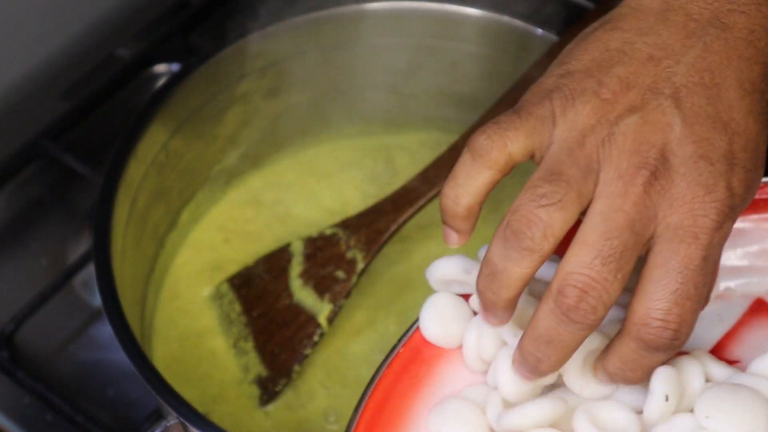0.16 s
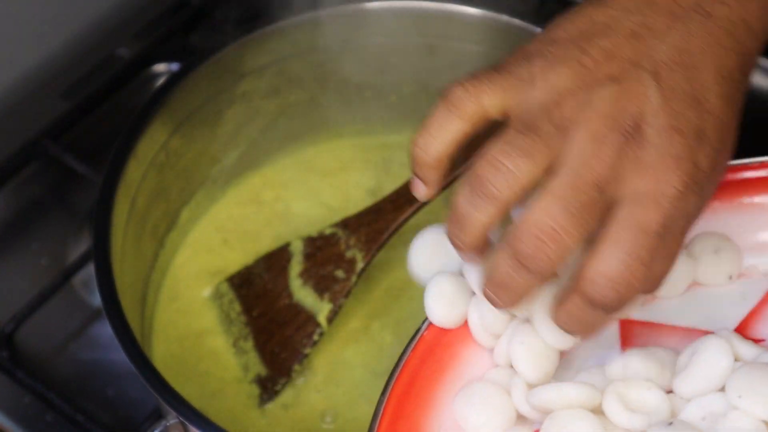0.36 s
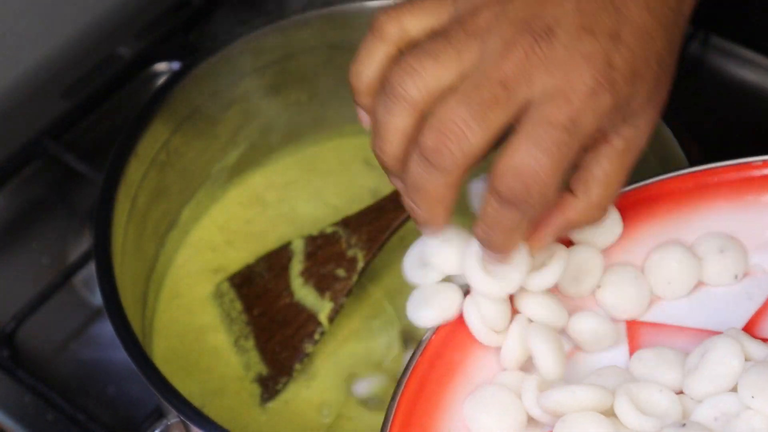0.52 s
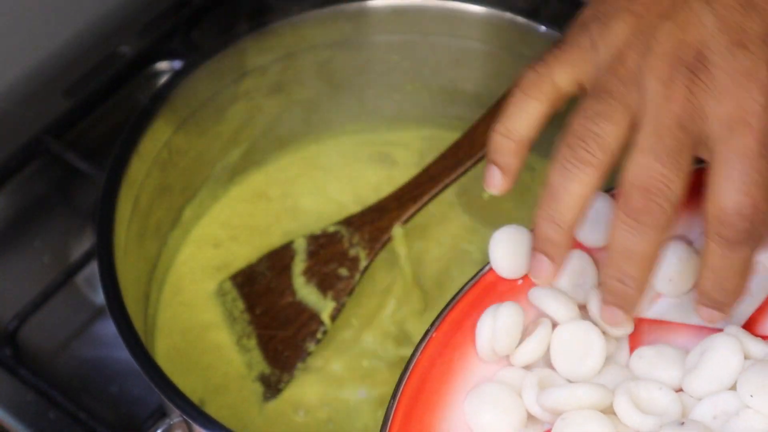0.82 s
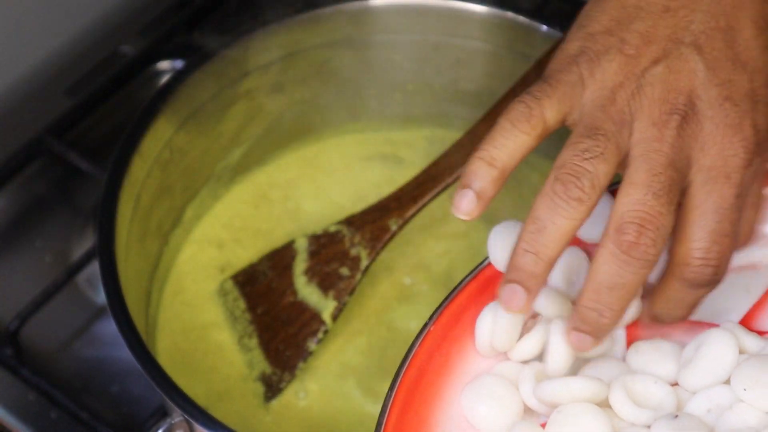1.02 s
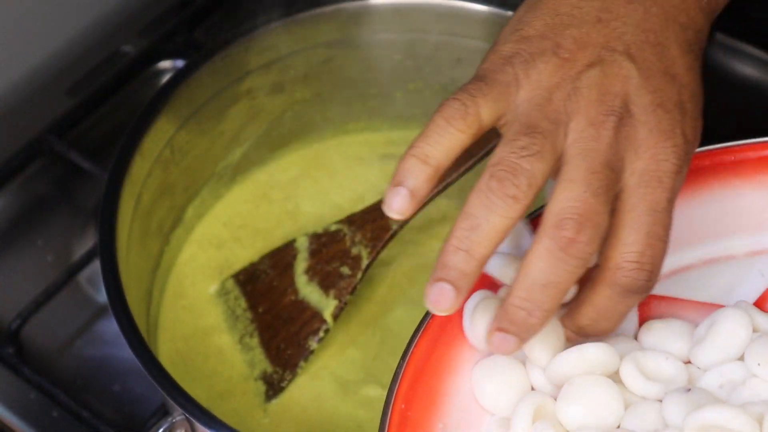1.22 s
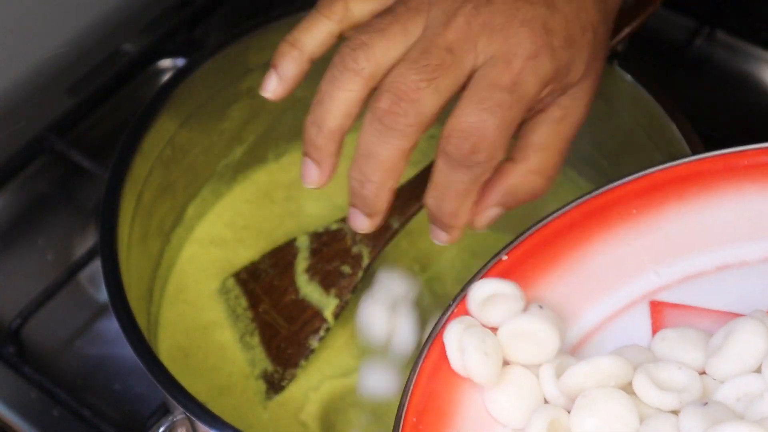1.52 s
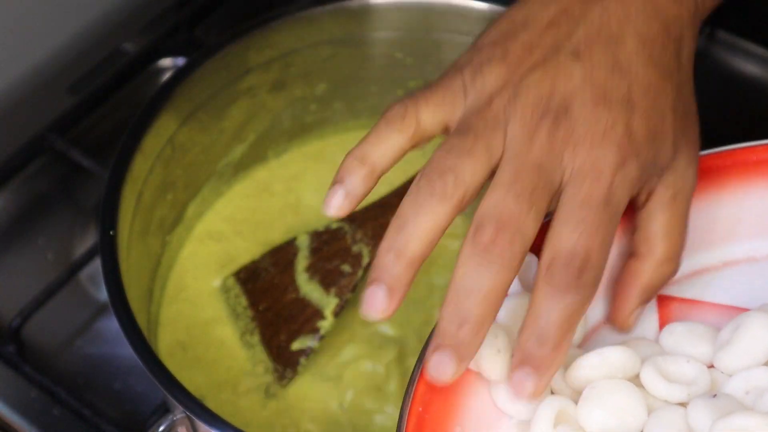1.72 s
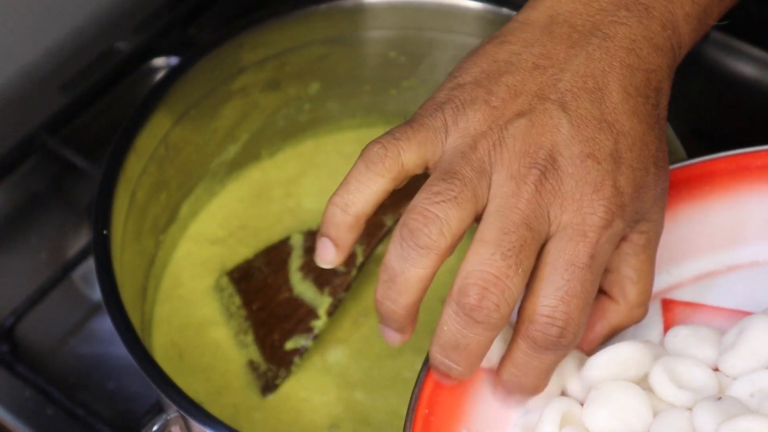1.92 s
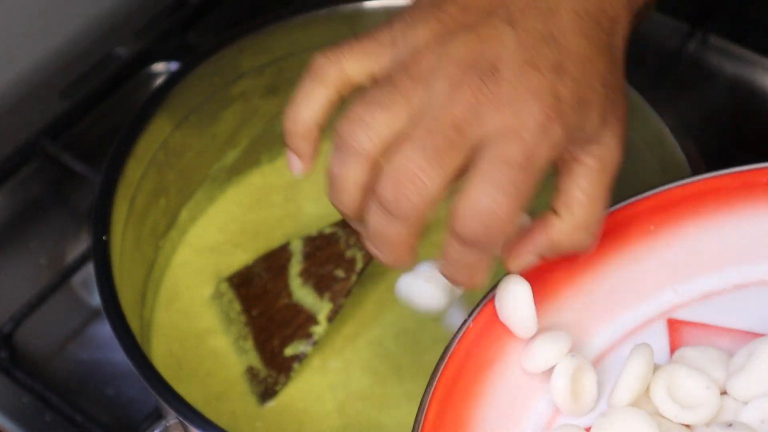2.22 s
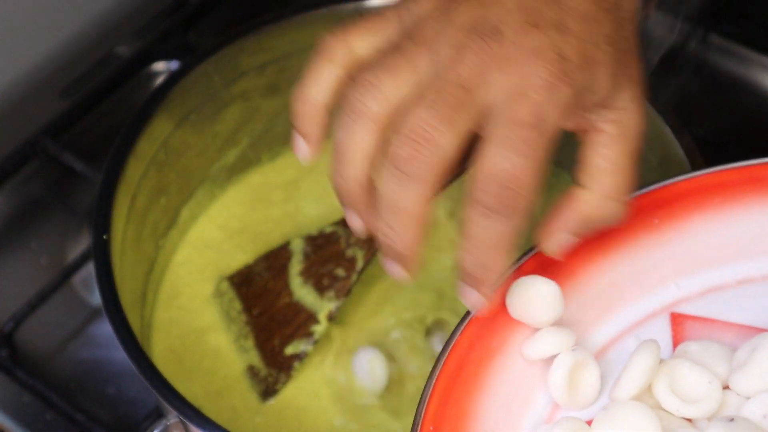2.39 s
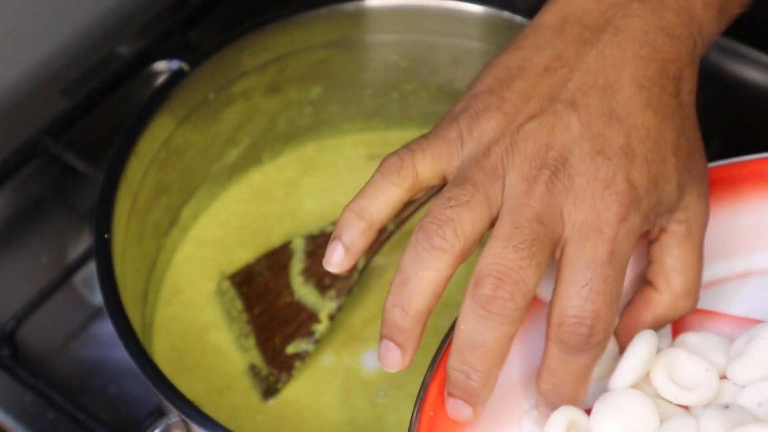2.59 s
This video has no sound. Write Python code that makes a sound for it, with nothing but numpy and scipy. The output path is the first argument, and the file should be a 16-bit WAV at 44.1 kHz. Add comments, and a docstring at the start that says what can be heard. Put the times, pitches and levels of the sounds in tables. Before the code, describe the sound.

Close, wide stereo kitchen sound: a plate bumps a pot once, then clusters of dough balls tick and plop into bubbling sauce, with faint rustling and finger scuffs between them over a steady low hum.

```python
"""Dough balls into simmering sauce

A plate knocks a pot once, as a sum of fading tones with echoes and a noisy room tail. Grainy noise makes
the dough balls rustle and fingertips scuff. Three handfuls of balls drop in: wet ticks are bursts of noise
with tiny pings, plops and bubbles are short fading tones. Underneath, shaped noise is the burner's hum and
the simmer's hiss, with murmuring bubbles. Close up in a kitchen: bass centred, treble very wide."""
import sys
import numpy as np
from scipy import signal
from scipy.fft import rfft, irfft, next_fast_len
from scipy.io import wavfile
from scipy.ndimage import map_coordinates

SR = 44100
rng = np.random.default_rng(int(sys.argv[2]) if len(sys.argv) > 2 else 0)


def pcm_store(signal):
    """Save signal as 16-bit PCM."""
    levels = np.round(np.clip(np.atleast_2d(signal), -1, 1) * 32767)
    wavfile.write(sys.argv[1], SR, levels.astype(np.int16).T)


N = 121275  # length in samples

# All the "t60" times below are how long a sound takes to fade by 60 dB.
# How wide the sound is. Each row: pitch in Hz, sides over centre in dB.
WIDTH = [(60, -39), (110, -23), (200, -9.5), (700, -7), (1290, -3), (2380, 3), (4400, 3.5), (8120, 9.5),
         (15000, 4)]
# Left-right balance of the pot. Each row: pitch in Hz, left over right in dB.
LEAN = [(950, 0), (1890, -1.5), (3770, 2), (7520, 4), (15000, -2)]
TOP_HZ = 15900  # nothing sounds above this

# Colour of the burner's hum. Each row: pitch in Hz, relative level in dB.
BURNER_COLOUR = [(12, -30), (20, -8), (74, 4), (119, -5), (152, 0), (203, -6.5), (296, -6), (371, -13.5),
                 (440, -3.5), (560, -12.5), (880, -81)]
# Loudness of the hum. Each row: time in seconds, level in dB.
BURNER_LEVEL = [(.3, -46.5), (.6, -45), (1.05, -44.5), (1.9, -46), (2.75, -45)]
# Colour of the simmer's hiss. Each row: pitch in Hz, relative level in dB.
SIMMER_COLOUR = [(210, -30), (400, -10), (540, -2.5), (841, -6), (1380, -9.5), (2690, -19.5), (2960, -16.5),
                 (6900, -19.5), (8760, -45), (9640, -28.5), (12000, -23), (14600, -42), (15800, -94)]
# Loudness of the simmer. Each row: time in seconds, level in dB.
SIMMER_LEVEL = [(0, -48.5), (.3, -48), (.6, -46.5), (1.1, -45), (1.35, -47.5), (1.8, -45), (2.3, -48),
                (2.75, -47)]
# The pot's resonances. Each row: pitch in Hz, width in Hz, relative level in dB.
POT_RESONANCES = [(524, 10, -3.5), (706, 9.2, -19), (897, 7.9, -0.5), (1309, 21, 0.5), (1437, 12, -2),
                  (1553, 4.5, 4), (2456, 13, -7.5), (2938, 30.5, -6), (5100, 14.6, -6)]
POT_DB = -54.5

# Simmer bubbles: average rate, typical level, middle pitch, spread of its natural log, fading time
BURBLE_PER_S, BURBLE_DB, BURBLE_HZ, BURBLE_SCATTER, BURBLE_T60_S = 34, -58.5, 473, 0.36, 0.019

KNOCK_S, KNOCK_DB = .1079, -12  # time and overall level of the plate's knock
KNOCK_LOW_HZ = 140  # the knock carries little bass below this
# The plate's dull body. Each row: pitch in Hz, relative level in dB, t60 in seconds.
THUD = [(300, -8, 0.046), (488, 0, 0.039), (790, 4.5, 0.014), (840, -3.5, 0.02), (1240, -14, 0.07)]
# The pot's short metallic ring. Each row: pitch in Hz, relative level in dB, t60 in seconds.
METAL = [(2200, -21, 0.026), (3540, -22.5, 0.061), (4590, -25, .05), (5360, -13.5, 0.023),
         (5700, -24.5, 0.047), (6700, -22, 0.031)]
METAL_LAG_S = .0015
# The pot's wall humming on. Each row: pitch in Hz, relative level in dB.
AFTER_RING = [(163, -25), (300, -23.5), (447, -24), (516, -19.5), (708, -20.5), (761, -26), (898, -20.5),
              (1041, -27)]
AFTER_RING_T60_S = 0.25
# Stove and walls answering the knock. Each row: delay in seconds, relative level in dB.
WALLS = [(.0053, -19), (0.0147, -21), (.0205, -24), (0.0353, -31)]
# Colour of the noisy tail of knock and plops. Each row: pitch in Hz, relative level in dB.
ROOM_COLOUR = [(80, -28), (170, -15), (280, 15.5), (500, -3), (900, 5), (1300, 3), (1900, -11), (6000, -14),
               (9000, -79)]

# Balls rustling on the plate. Each row: middle in seconds, half-length in seconds, level in dB.
RUSTLES = [(0.442, 0.047, -48), (0.622, 0.052, -44.5), (0.999, 0.071, -50.5), (1.12, 0.054, -45),
           (1.515, 0.031, -48.5), (2.572, 0.22, -48)]
# Colour of the rustling. Each row: pitch in Hz, relative level in dB.
RUSTLE_COLOUR = [(120, -24), (200, -8), (419, -22), (624, -2), (1540, -4.5), (1750, -13), (5260, -13.5),
                 (15000, -34.5)]
# Fingertips scuffing. Each row: middle in seconds, half-length in seconds, level in dB.
SCUFFS = [(.972, 0.019, -53), (1.08, .04, -53), (1.13, 0.022, -46)]
# Colour of the scuffing. Each row: pitch in Hz, relative level in dB.
SCUFF_COLOUR = [(2700, -27), (3500, -0.5), (3900, -9), (5300, 0), (5900, -10), (6700, -8), (9000, -25)]
SCUFF_ROUGH_DB, SLIPS_PER_S = 4, 140  # how much the scuff's level jitters, and how fast

# Wet ticks, and one dull knock at 2.08 s. Each row: start in seconds, level in dB before SPLAT_DB,
# tail t60 in seconds, tilt in dB per octave, strongest resonance in Hz.
SPLATS = [(0.5874, -28, .05, -2, 5400), (0.5962, -35.5, 0.11, 0, 2470), (.610, -36, 0.038, 11, 6600),
          (.6338, -29.5, .04, 5.5, 6300), (0.66, -35.5, 0.1, 2.5, 6370), (0.7485, -33, 0.053, 4.5, 4750),
          (0.7776, -33, .07, 5, 5200), (.7905, -28.5, .089, 0.5, 2480), (0.8086, -20.5, 0.053, 1, 5900),
          (0.8211, -27, 0.028, -2, 5800), (0.8551, -21, 0.058, 1, 4260), (.874, -30.5, .06, 4, 4560),
          (0.8892, -34, 0.092, 5, 5150), (1.4529, -36, 0.097, 3, 5500), (1.494, -33, .089, 4, 5400),
          (1.579, -26.5, 0.032, 2.5, 6530), (1.595, -38.5, .05, 6, 4400), (1.6293, -34.5, 0.085, 10, 6250),
          (1.6672, -31, 0.18, 6, 4200), (1.678, -26, 0.091, 0, 6540), (1.727, -33.5, 0.046, 1.5, 4230),
          (1.7636, -31, 0.1, 1, 2440), (1.8177, -32, 0.055, 3.5, 3980), (2.080, -30.5, .035, -4.5, 2000),
          (2.434, -33.5, 0.11, 3, 3100), (2.4412, -23.5, 0.034, 4, 6660), (2.4447, -26, 0.088, 6, 4900),
          (2.4742, -32, 0.088, 3.5, 3600), (2.493, -38, 0.19, 7, 6370), (2.5779, -34.5, .06, 5, 5270),
          (2.6154, -37, .042, 4, 6600)]
# Colour shared by the rows above. Each row: pitch in Hz, relative level in dB.
SPLAT_COLOUR = [(350, -9), (678, 2), (1690, -8), (2470, -6), (3380, -11), (5820, -9.5), (7140, -12.5),
                (8400, -24), (13000, -18), (15500, -68)]
SPLAT_DB, SPLAT_LOW_HZ = -8, 252  # overall level; little bass is left below this
CRACK_DB, CRACK_T60_S = -16, 0.0073  # first crack, beside the longer tail
RIPPLE_DB, TILT_HZ = 1, 3500  # unevenness of each hit's colour; pivot of its tilt
RESONANCE_DB, RESONANCE_OCTAVES = 10, 0.059  # height and half-width of each hit's resonance
SPRAY_DB, SPRAY_T60_S, SPRAY_PER_S = -12, 0.16, 640  # spray under each hit, and its droplet rate
DROPLET_HZ, DROPLET_SCATTER = 4300, 0.41  # middle pitch, spread of its natural log
DROPLET_CYCLES = 13.7  # fading time of a droplet, in cycles of its pitch

# Plops in the pot's hollow. Each row: start in seconds, level in dB before PLOP_DB, pitch in Hz.
PLOPS = [(.632, -30.5, 514), (.7482, -26.5, 511), (.808, -32.5, 457), (.854, -30.5, 515),
         (1.015, -30.5, 455), (1.578, -32.5, 443), (1.6695, -32, 500), (1.675, -22, 529), (1.932, -32, 493),
         (2.002, -31, 505), (2.082, -34.5, 455), (2.15, -31, 514), (2.441, -28.5, 497), (2.495, -30, 508)]
PLOP_DB, PLOP_T60_S, PLOP_RISE_S = -1.5, 0.055, 0.0014
# Colour of the sauce's low heave. Each row: pitch in Hz, relative level in dB.
SLOSH_COLOUR = [(35, -37), (70, 6), (115, -13), (160, -1.5), (260, -27), (500, -50)]
SLOSH_DB, SLOSH_T60_S = -16.5, 0.26

# Balls bumping softly on the plate. Each row: start in seconds, level in dB, pitch in Hz.
BUMPS = [(1.019, -39.5, 710), (1.054, -40, 680), (1.094, -33.5, 670), (1.101, -38.5, 1040),
         (2.082, -36.5, 1000)]
BUMP_T60_S = 0.043

# Ringing bubbles. Each row: start in seconds, level in dB, first pitch in Hz,
# climb in Hz per second, t60 in seconds.
BUBBLES = [(1.7264, -18.5, 4250, 15000, 0.008), (2.458, -37, 3040, 9100, 0.084),
           (2.474, -43, 3480, 9000, 0.053), (2.488, -40, 3630, 9000, 0.067)]


def amp(db):
    """Turn decibels into a gain."""
    return 10 ** (np.asarray(db) / 20)


def unit(x):
    """Scale to an average strength (rms) of 1."""
    return x / np.sqrt(np.mean(x ** 2) + 1e-20)


def along(points, hz):
    """Read a curve of (Hz, value) points, with pitch on a log axis."""
    point_hz, values = np.transpose(points)
    return np.interp(np.log(hz + 1), np.log(point_hz + 1), values)


def filtered(x, response):
    """Multiply each frequency of x by the response there."""
    n = x.shape[-1]
    m = next_fast_len(n + SR // 4)  # room for the filter's tail
    return irfft(rfft(x, m) * response(np.fft.rfftfreq(m, 1 / SR)), m)[..., :n]


def coloured(x, colour):
    """Shape x with a colour table, at rms 1."""
    return unit(filtered(x, lambda hz: amp(along(colour, hz))))


def low_cut(x, hz):
    """Weaken the bass below hz."""
    return signal.sosfilt(signal.butter(2, hz, "high", fs=SR, output="sos"), x)


def spread(pair):
    """Use one signal as centre and the other as sides, giving left and right."""
    mid = pair[0]
    side = filtered(pair[1], lambda hz: amp(along(WIDTH, hz)))
    return np.array([mid + side, mid - side])


def fade(t, t60):
    """Die away smoothly, losing 60 dB in t60 seconds."""
    return np.exp(-np.log(1000) * t / t60)


def rise(t, rise_s):
    """Swell quickly from silence, so that a sound starts without a click."""
    return 1 - np.exp(-t / rise_s)


def crackle(n, per_s):
    """Two trains of random tiny impulses, at rms 1."""
    hits = rng.standard_normal((2, n)) * (rng.random((2, n)) < per_s / SR)
    return unit(hits)


def add(out, s, x):
    """Mix x into out at time s."""
    i = round(s * SR)
    out[:, i:i + x.shape[-1]] += x[..., :N - i]


def stove(fizz_db=-9, fizz_per_s=500):
    """Burner hum and simmer hiss are shaped noise; more noise through resonances is the pot's hollow."""
    def level(rows):
        return amp(np.interp(np.arange(N) / SR, *np.transpose(rows)))

    def hollow(f):
        return sum(amp(db) * 1j * f * w / (c * c - f * f + 1j * f * w) for c, w, db in POT_RESONANCES)

    hum = level(BURNER_LEVEL) * coloured(rng.standard_normal((2, N)), BURNER_COLOUR)
    fizz = rng.standard_normal((2, N)) + amp(fizz_db) * crackle(N, fizz_per_s)
    simmer = level(SIMMER_LEVEL) * coloured(fizz, SIMMER_COLOUR)
    pot = amp(POT_DB) * unit(filtered(rng.standard_normal((2, N)), hollow))
    return spread(hum + simmer + pot)


def burbles(count=90, size_db=3, rise_s=0.0016, climb_per_s=2):
    """Small simmer bubbles murmur at random times, as short tones that climb a little in pitch."""
    out, t = np.zeros((2, N)), np.arange(SR // 10) / SR
    times = np.cumsum(rng.exponential(size=count)) / BURBLE_PER_S
    for s, (pitch, size) in zip(times, rng.standard_normal((count, 2))):
        if s < (N - 1) / SR:
            hz = BURBLE_HZ * np.exp(BURBLE_SCATTER * pitch)
            cycles = hz * t * (1 + climb_per_s * t / 2)
            tone = np.sin(2 * np.pi * cycles) * fade(t, BURBLE_T60_S) * rise(t, rise_s)
            add(out, s, amp(BURBLE_DB + size_db * size) * tone)
    return out


def knock(rise_s=0.00049, room_db=-22, room_t60=0.34, room_rise_s=0.0016, lean_db=1, metal_side_db=3):
    """The plate bumps the pot: fading tones make thud and metal ring, copies and noise the kitchen's answer."""
    out, t = np.zeros((2, N)), np.arange(SR // 2) / SR

    def ring(modes):
        tones = sum(amp(db) * fade(t, t60) * np.sin(2 * np.pi * hz * t) for hz, db, t60 in modes)
        return tones * rise(t, rise_s)

    room = spread(coloured(rng.standard_normal((2, len(t))), ROOM_COLOUR))
    room = room * fade(t, room_t60) * rise(t, room_rise_s)
    wall_hum = [(hz, db, AFTER_RING_T60_S) for hz, db in AFTER_RING]
    body = ring(THUD + wall_hum) * amp(lean_db * np.array([[-.5], [.5]]))  # a little to the right
    add(out, KNOCK_S, body + amp(room_db) * room)
    for delay_s, db in WALLS:
        add(out, KNOCK_S + delay_s, amp(db) * ring(THUD + METAL))
    metal_gains = 1 + amp(metal_side_db) * np.array([[1], [-1]])  # stronger left, flipped right
    add(out, KNOCK_S + METAL_LAG_S, ring(METAL) * metal_gains)
    return amp(KNOCK_DB) * low_cut(out, KNOCK_LOW_HZ)


def fingers(grains_per_s=3200):
    """Dough balls shuffle in soft grainy swells; fingertips stick and slip, as grains of jittering level."""
    t = np.arange(N) / SR

    def swells(rows):
        return sum(amp(db) * np.exp(-((t - s) / half) ** 2) for s, half, db in rows)

    def grains(colour):
        return coloured(crackle(N, grains_per_s), colour)

    jitter = map_coordinates(rng.standard_normal(SR // 20), [t * SLIPS_PER_S])
    slips = unit(amp(SCUFF_ROUGH_DB * jitter))
    rustle = swells(RUSTLES) * grains(RUSTLE_COLOUR)
    scuff = swells(SCUFFS) * slips * grains(SCUFF_COLOUR)
    return spread(rustle + scuff)


def droplets(n):
    """Spray is a train of tiny damped pings, each at its own pitch, at rms 1."""
    t = np.arange(SR // 100) / SR
    pitch, size = rng.standard_normal((2, SR // 100, 1))
    starts = np.cumsum(rng.exponential(size=pitch.shape), axis=0) * SR / SPRAY_PER_S
    at = starts.astype(int) + np.arange(len(t))
    hz = np.minimum(DROPLET_HZ * np.exp(DROPLET_SCATTER * pitch), TOP_HZ)
    pings = size * np.sin(2 * np.pi * hz * t) * fade(t, DROPLET_CYCLES / hz)
    return unit(np.bincount(at.ravel(), pings.ravel(), n)[:n])


def splats(knots_per_octave=6):
    """Balls slap the sauce, and one knock sounds dull: noise with crack, tail and spray, each its own colour."""
    out, t = np.zeros((2, N)), np.arange(SR // 4) / SR
    for s, db, t60, tilt_db, peak_hz in SPLATS:
        burst_shape = amp(CRACK_DB) * fade(t, CRACK_T60_S) + fade(t, t60)
        burst = rng.standard_normal((2, len(t))) * burst_shape
        spray = amp(SPRAY_DB) * droplets(2 * len(t)).reshape(2, -1) * fade(t, SPRAY_T60_S)
        knots = rng.standard_normal(SR // 100)

        def hit_colour(hz):
            ripple = RIPPLE_DB * map_coordinates(knots, [knots_per_octave * np.log2(hz + 1)])
            tilt = tilt_db * np.log2(np.maximum(hz / TILT_HZ, 1 / 10))
            octaves_away = np.log2((hz + 1) / peak_hz)
            peak = RESONANCE_DB / (1 + (octaves_away / RESONANCE_OCTAVES) ** 2)
            return unit(amp(along(SPLAT_COLOUR, hz) + ripple + tilt + peak))

        add(out, s, amp(db + SPLAT_DB) * filtered(burst + spray, hit_colour))
    return spread(low_cut(out, SPLAT_LOW_HZ))


def plops(room_db=-15, room_t60=0.095):
    """The hollow of the pot rings as a short tone, with a dull noisy wash and a low heave of the sauce."""
    out, t = np.zeros((2, N)), np.arange(SR // 4) / SR
    for s, db, hz in PLOPS:
        tone = np.sin(2 * np.pi * hz * t) * fade(t, PLOP_T60_S)
        wash = spread(coloured(rng.standard_normal((2, len(t))), ROOM_COLOUR)) * fade(t, room_t60)
        heave = coloured(rng.standard_normal(len(t)), SLOSH_COLOUR) * fade(t, SLOSH_T60_S)
        plop = tone + amp(room_db) * wash + amp(SLOSH_DB) * heave
        add(out, s, amp(db + PLOP_DB) * plop * rise(t, PLOP_RISE_S))
    return out


def bumps():
    """Soft dough meets the plate: a dull tone that dies quickly."""
    out, t = np.zeros((2, N)), np.arange(SR // 8) / SR
    for s, db, hz in BUMPS:
        add(out, s, amp(db) * np.sin(2 * np.pi * hz * t) * fade(t, BUMP_T60_S))
    return out


def bubbles(rise_s=0.00077, right_db=-6):
    """Trapped air rings and climbs in pitch as it reaches the surface, louder on the left."""
    out, t = np.zeros((2, N)), np.arange(SR // 8) / SR
    for s, db, hz, climb, t60 in BUBBLES:
        cycles = (hz + climb * t / 2) * t
        tone = np.sin(2 * np.pi * cycles) * fade(t, t60) * rise(t, rise_s)
        add(out, s, amp(db) * tone * amp([[0], [right_db]]))
    return out


def scene():
    """Mix all layers; all but the plate's knock and the ringing bubbles get the left-right lean."""
    pot = splats() + plops() + burbles() + bumps() + fingers() + stove()
    halves = np.array([[.5], [-.5]])  # half the lean up on the left, half down on the right
    leaning = filtered(pot, lambda hz: amp(along(LEAN, hz) * halves))
    return knock() + bubbles() + leaning


def record(dry):
    """Keep only what lies below the upper band limit."""
    return filtered(dry, lambda hz: hz < TOP_HZ)


dry = scene()
out = record(dry)
pcm_store(out)
```